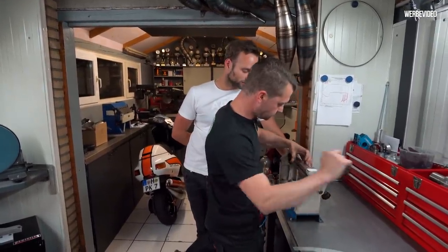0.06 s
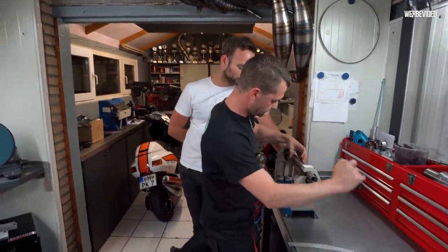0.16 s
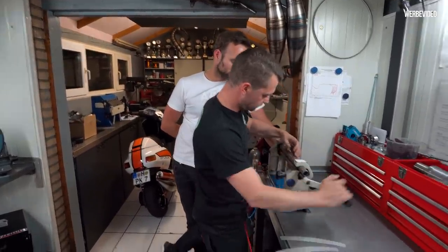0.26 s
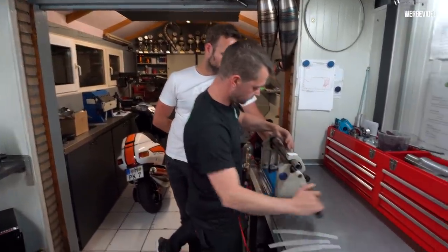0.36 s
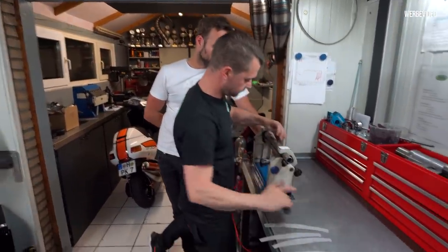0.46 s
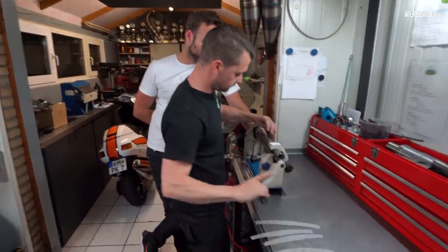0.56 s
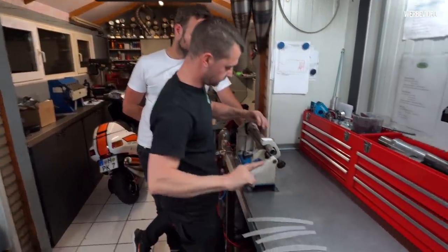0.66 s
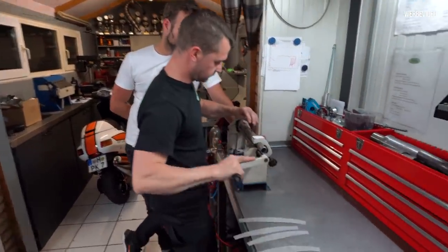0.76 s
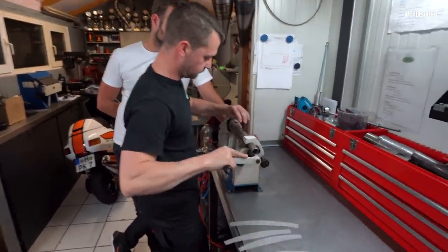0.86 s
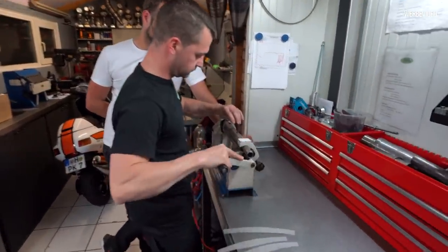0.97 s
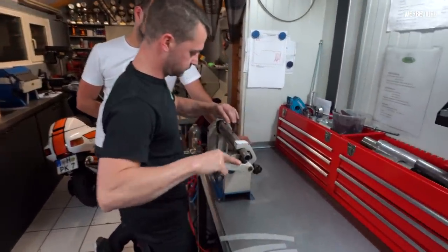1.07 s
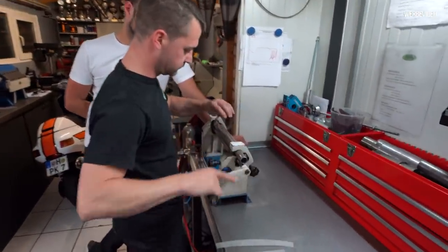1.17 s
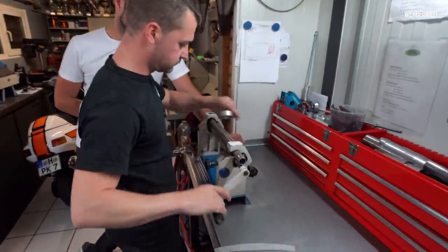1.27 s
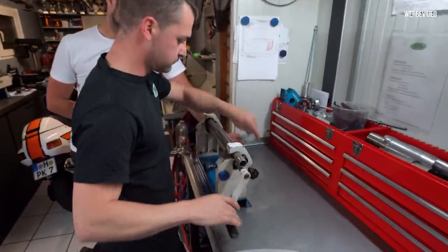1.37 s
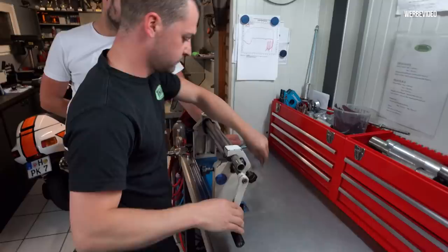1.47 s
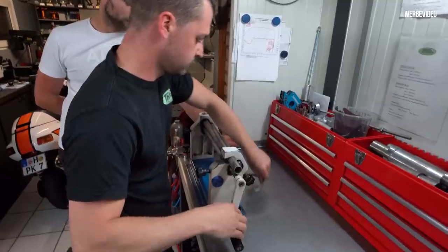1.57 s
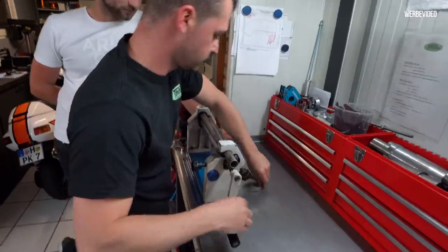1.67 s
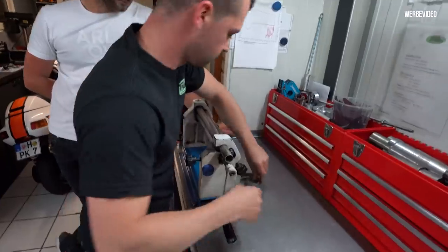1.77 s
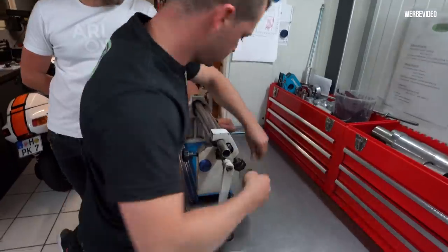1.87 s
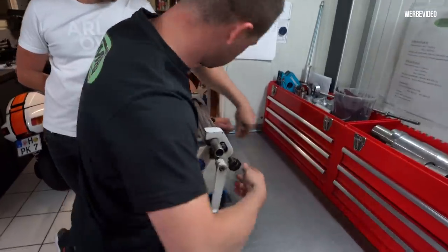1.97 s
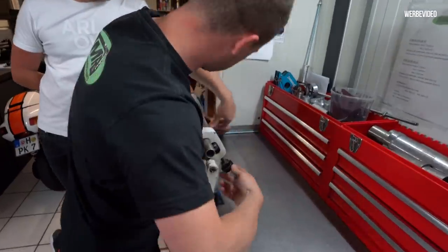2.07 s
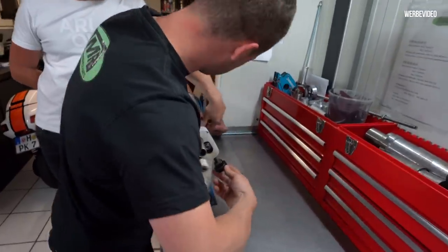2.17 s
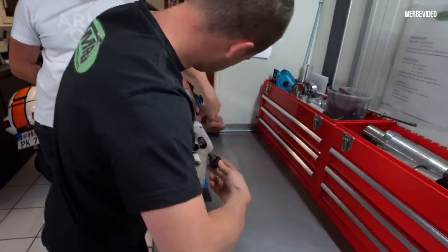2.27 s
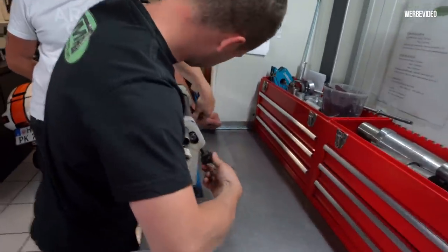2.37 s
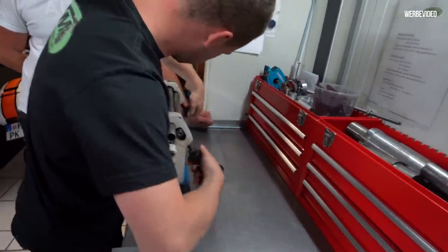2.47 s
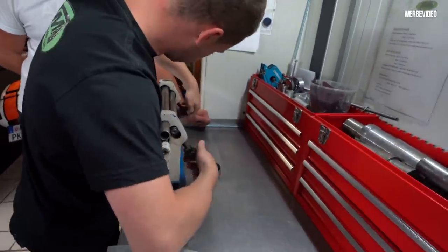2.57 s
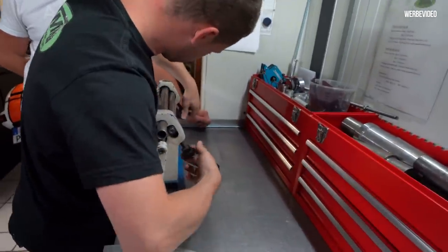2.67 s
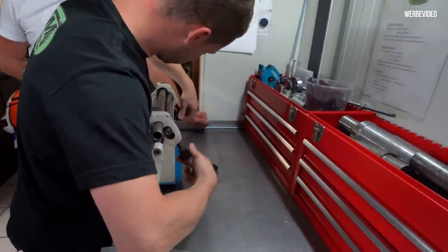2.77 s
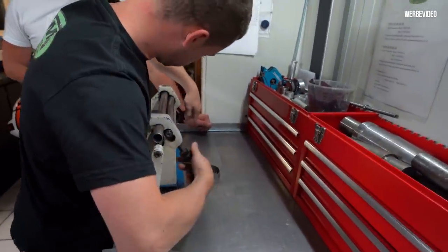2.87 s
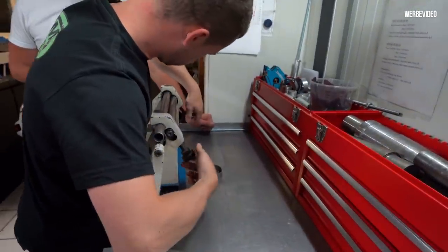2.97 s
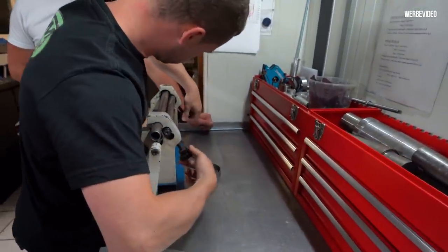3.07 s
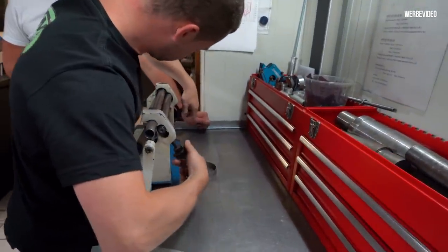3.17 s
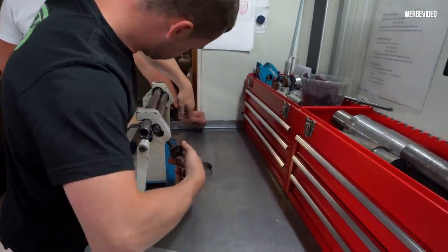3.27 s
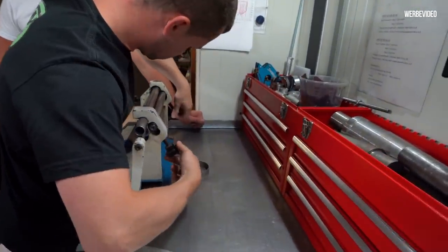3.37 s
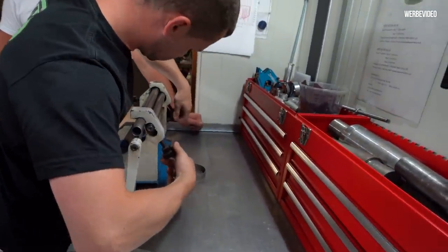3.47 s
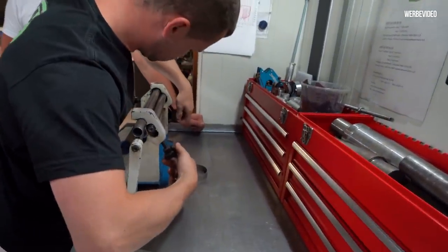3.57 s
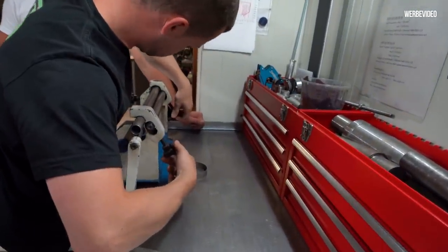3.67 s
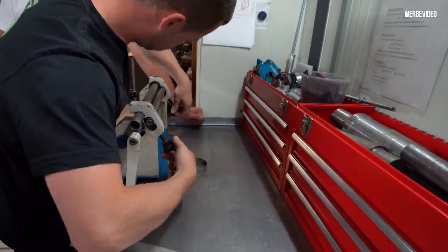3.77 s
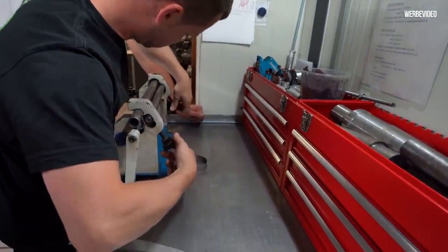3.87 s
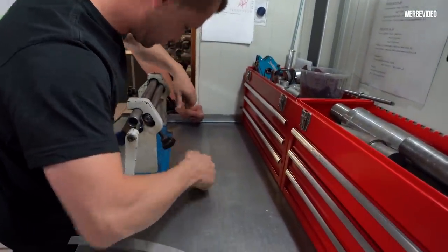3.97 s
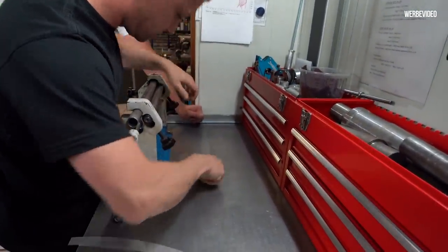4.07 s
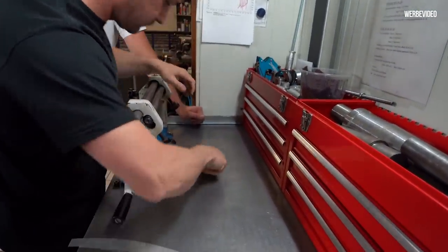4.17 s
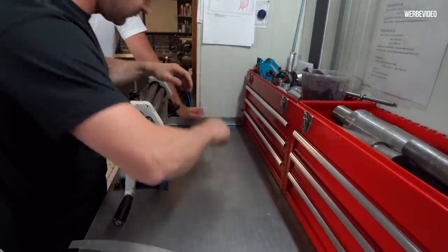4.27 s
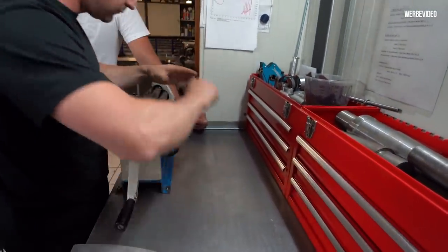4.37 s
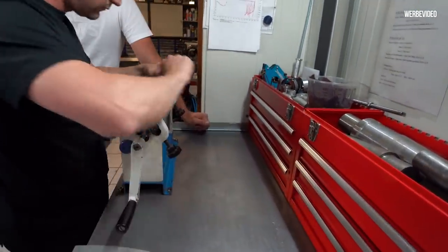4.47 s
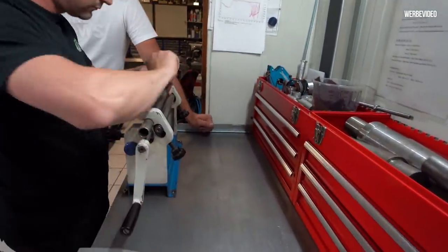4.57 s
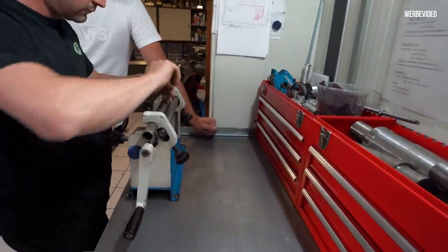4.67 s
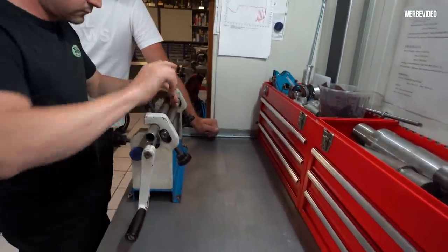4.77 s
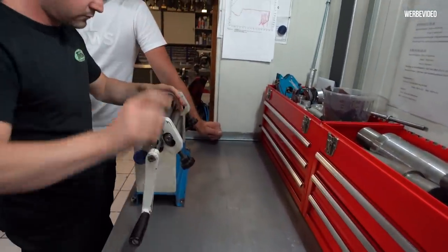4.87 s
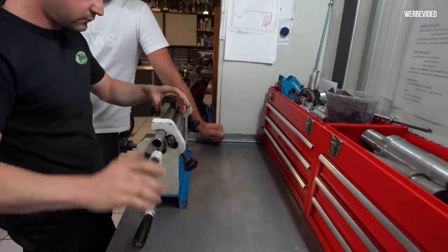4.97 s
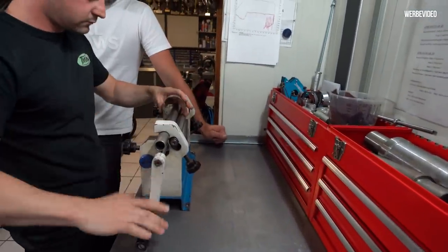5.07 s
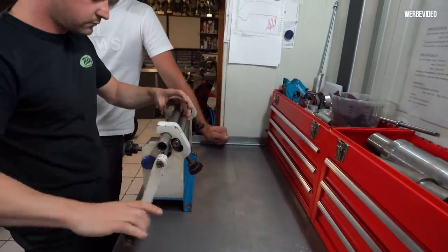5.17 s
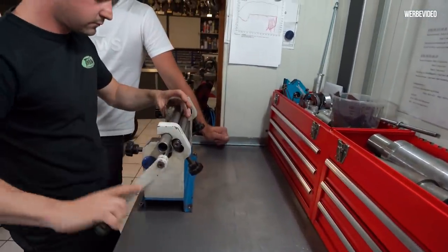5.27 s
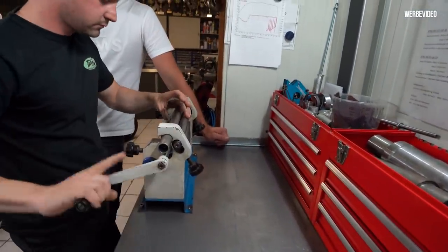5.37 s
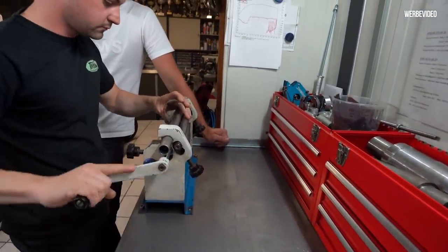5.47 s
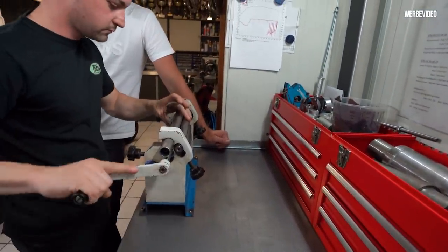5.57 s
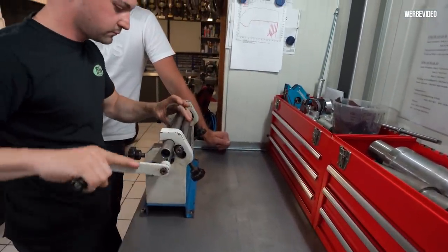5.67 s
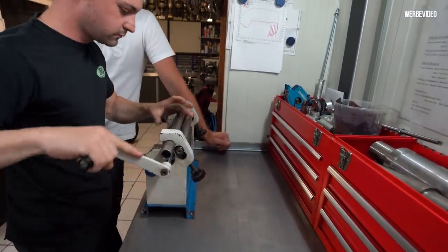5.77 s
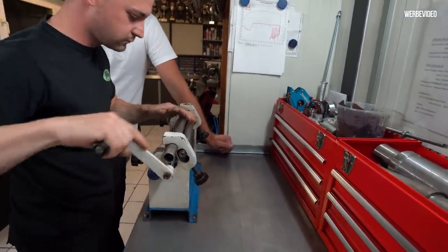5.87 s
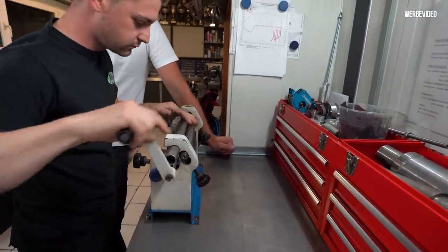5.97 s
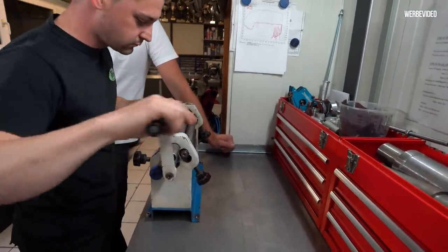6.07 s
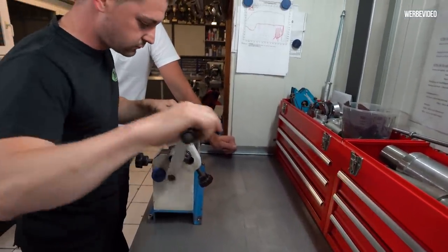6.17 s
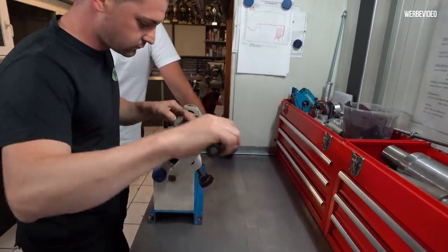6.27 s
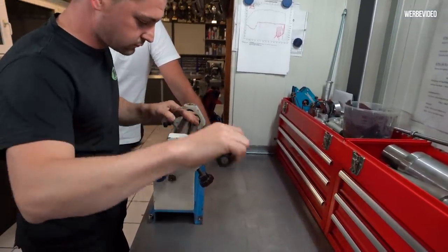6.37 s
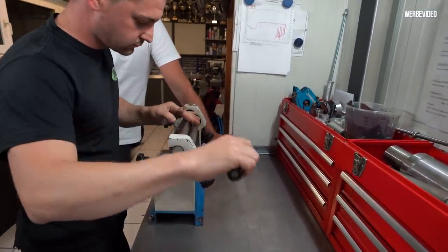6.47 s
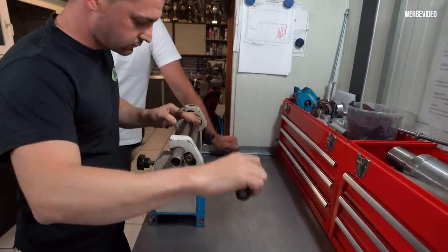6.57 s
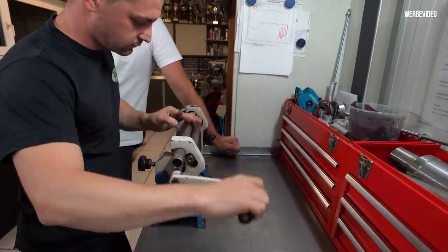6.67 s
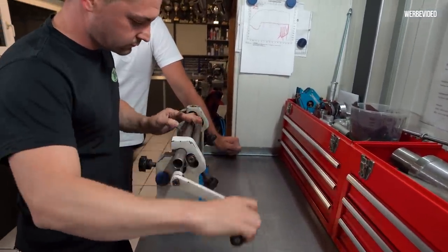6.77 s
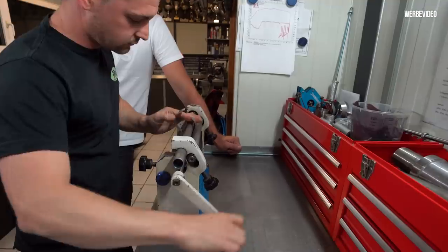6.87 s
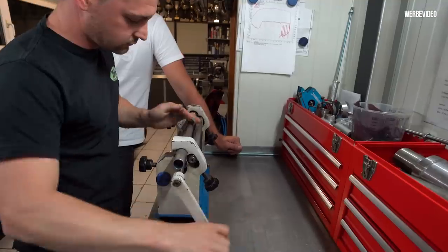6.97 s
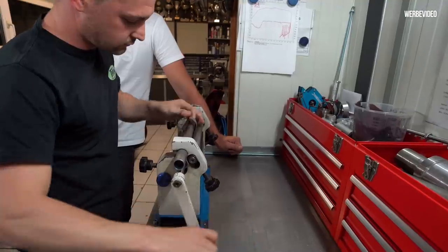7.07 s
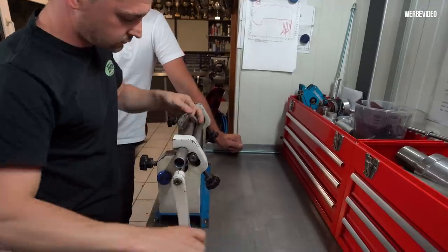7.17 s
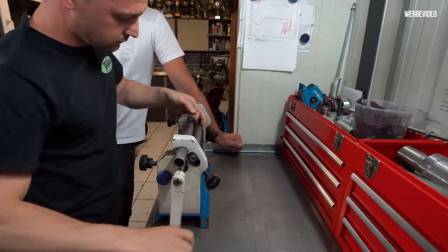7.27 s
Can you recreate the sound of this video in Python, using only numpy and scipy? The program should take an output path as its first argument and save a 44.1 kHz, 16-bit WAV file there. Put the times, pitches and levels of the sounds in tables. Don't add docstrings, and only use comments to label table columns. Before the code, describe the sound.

In a small metal workshop, a hand-cranked rolling machine ticks quickly, about twenty teeth a second, then its handle clanks hard on a stop. Loose parts jingle, and a steel strip scrapes and drops with bright ringing bounces. Sparse knocks and clicks follow, then sharp clacks of the handle and slow, thudding gear turns with faint squeaks. Close small mono microphone, low rumble and hiss ducking in the gaps.

```python
import sys
import numpy as np
from scipy import signal
from scipy.fft import rfft, irfft, next_fast_len
from scipy.io import wavfile
from scipy.ndimage import uniform_filter1d, minimum_filter1d, map_coordinates

SR = 44100
rng = np.random.default_rng(int(sys.argv[2]) if len(sys.argv) > 2 else 0)


def log_audio(samples):
    frames = np.atleast_2d(samples).T
    limited = np.clip(frames, -1, 1)
    pcm = np.round(limited * 32767).astype(np.int16)
    wavfile.write(sys.argv[1], SR, pcm)


def how_loud(loudness_db):
    steps = np.asarray(loudness_db, float) / 20
    return 10 ** steps


N = 322944
T = np.arange(SR // 5) / SR


def unit(x):
    return x / np.sqrt(np.mean(x ** 2) + 1e-20)


def along(points, hz):
    f, v = np.transpose(points)
    return np.interp(np.log(hz + 1), np.log(f + 1), v)


def curves(rows, off=-140):
    s, *cols = np.transpose(rows)
    return [np.interp(np.arange(N) / SR, s, c, off, off) for c in cols]


def noise(spectrum, size=N):
    m = next_fast_len(size)
    points = [(10, -120)] + list(spectrum) + [(spectrum[-1][0] * 1.5, -60)]
    gain = how_loud(along(points, np.fft.rfftfreq(m, 1 / SR)))
    return unit(irfft(rfft(rng.standard_normal(m)) * gain, m)[:size])


def wobble(rate, size=N):
    knots = rng.standard_normal(int(size * rate / SR) + 4)
    return map_coordinates(knots, [np.arange(size) * rate / SR])


def add(track, s, sound):
    track[round(s * SR):][:len(sound)] += sound


def ring(modes, scatter_db, attack=0.0018, rough_db=0):
    hz, db, t60 = np.transpose(modes)[:, :, None]
    db = db + rng.normal(0, scatter_db, db.shape)
    hz = hz * rng.normal(1, 0.00024, hz.shape)
    phase = rng.uniform(0, 2 * np.pi, hz.shape)
    flutter = np.repeat(rng.standard_normal((len(hz), len(T) // 256 + 1)), 256, axis=1)[:, :len(T)]
    db = db + rough_db * uniform_filter1d(flutter, size=256, axis=1)
    partials = how_loud(db - 60 * T / t60) * np.sin(2 * np.pi * hz * T + phase)
    return partials.sum(0) * (1 - np.exp(-T / attack))


def burst(spectrum, t60, attack=0.00023):
    return noise(spectrum, size=len(T)) * how_loud(-60 * T / t60) * (1 - np.exp(-T / attack))


def thud(hz, swell, rough=0.32):
    u = T / max(swell, .003)
    near = noise([(hz * 0.2, -16), (hz * 0.66, -3), (hz, 0), (hz * 1.27, -5), (hz * 3, -22)], size=len(T))
    return (np.sin(2 * np.pi * hz * T) + rough * near) * u ** 2 * np.exp(2 - 2 * u)


# time in seconds, rumble in dB.
ROLLING = [(0, -39), (.37, -36), (.6, -42), (.85, -48.5), (1.3, -42), (1.6, -49.5), (2.2, -49),
           (2.49, -45.5), (2.7, -50.5), (3.5, -48), (4.0, -53), (4.3, -50), (4.95, -50.5), (5.6, -55),
           (5.85, -42.5), (6.45, -50), (6.8, -45.5), (7.33, -51.5)]
# frequency in Hz, level in dB per Hz.
RUMBLE = [(24, -40), (45, -31), (123, -1.5), (157, -6.5), (241, -8.5), (444, -18), (700, -28), (910, -51.5)]
GRIND = [(290, -41), (500, -10.5), (1140, -1.5), (1460, -7.5), (1740, -9.5), (2370, -12.5), (7000, -26),
         (9100, -55)]
HISS = [(2500, -19), (5000, -6), (8000, -3), (12000, -0.5), (15500, -1)]
HISS_DB = -66.5
GRIND_DB, GRIND_FOLLOWS = -57, 0.39
BOOM_DB, BOOM_S, BOOM_HZ = -18, 0.073, 500


def background(metal):
    rumble_db, = curves(ROLLING, off=-50)
    width = int(BOOM_S * SR)
    low = uniform_filter1d(metal, SR // BOOM_HZ // 2)
    power_after = np.abs(uniform_filter1d(low ** 2, width, origin=(width - 1) // 2))
    boom = how_loud(BOOM_DB) * power_after ** 0.46
    rumble = (how_loud(rumble_db) + boom) * how_loud(2.9 * wobble(14)) * noise(RUMBLE)
    grind_db = GRIND_DB + GRIND_FOLLOWS * (rumble_db + 51) + 2.4 * wobble(25)
    return rumble + how_loud(grind_db) * noise(GRIND) + how_loud(HISS_DB) * noise(HISS)


# time in seconds, tick peak in dB, ring in Hz, thud in dB, thud in Hz.
QUICK_TEETH = [(0.0175, -29, 1180, -32.5, 394), (0.0648, -27, 1750, -33.5, 470),
               (0.109, -16, 1400, -31, 390), (0.1501, -21, 1300, -34, 481), (0.194, -20, 2020, -33, 392),
               (0.242, -23, 1890, -31.5, 344), (0.299, -24, 1200, -35, 502),
               (0.3468, -23, 1890, -30.5, 454), (0.3924, -21.5, 1330, -29.5, 390),
               (0.4399, -25.5, 1930, -24.5, 393), (0.4915, -26.5, 1956, -26.5, 395),
               (0.5548, -33, 1180, -41, 464), (0.6258, -30, 1520, -33, 286), (0.691, -36.5, 1750, -48, 495),
               (0.7384, -32, 1205, -38.5, 269), (1.1904, -34, 974, -38.5, 596),
               (1.265, -32, 2270, -34.5, 384.5), (1.354, -31, 1730, -35, 389),
               (1.4157, -37, 1770, -51.5, 462), (1.4536, -28, 1810, -46, 355)]
LOADED_TEETH = [(5.6878, -43, 2060, -34.5, 283), (5.7978, -27, 770, -26, 292.5),
                (5.9148, -31.5, 2050, -29.5, 288), (6.019, -33.5, 1340, -36.5, 287),
                (6.114, -26.5, 1340, -26, 485.6), (6.206, -24.5, 1180, -22, 382),
                (6.3074, -31, 1216, -29.5, 373), (6.5, -39.5, 1210, -29, 384),
                (6.6375, -29, 1660, -23, 382), (6.747, -31, 1180, -24, 390), (6.8468, -27, 796, -23, 390),
                (6.962, -29, 2070, -30, 390), (7.1356, -42, 1630, -35, 364)]
# frequency in Hz, level in dB, t60 in seconds.
FRAME = [(775, -9.5, 0.09), (1180, -0.5, 0.11), (1354, 0, 0.065), (1664, -2, 0.076), (2065, -8.5, 0.17),
         (2650, -12.5, .1), (3870, -11, 0.022), (4630, -22, 0.033)]
LOADED_FRAME = [(774, -3, 0.09), (1180, 2.5, 0.089), (1356, -4, 0.044), (1660, 0.5, 0.097),
                (2065, -10, 0.1), (2440, -16, .06), (2660, -16, .07)]
QUICK_TREBLE_DB, QUICK_SWELL_S = -19.5, 0.014
LOADED_TREBLE_DB, LOADED_SWELL_S = -24, .017
TREBLE_LAG = 0.35


def gears():
    out = np.zeros(N + SR)
    teeth = [(*row, QUICK_TREBLE_DB, QUICK_SWELL_S, FRAME, .0005) for row in QUICK_TEETH]
    teeth += [(*row, LOADED_TREBLE_DB, LOADED_SWELL_S, LOADED_FRAME, .003) for row in LOADED_TEETH]
    for s, db, hz, thud_db, thud_hz, bright_db, swell_s, frame, attack_s in teeth:
        treble_db = bright_db - TREBLE_LAG * (db + 29.5)
        tick = 0.71 * burst([(500, -10.5), (1300, 1.5), (2200, -3.5), (3200, -16.5)], t60=0.096, attack=attack_s)
        tick += .55 * ring(frame, scatter_db=1.0, rough_db=4.5)
        tick += .9 * ring([(hz, 0, .07)], scatter_db=0.5, rough_db=3.5)
        treble = burst([(2500, -7.5), (3800, 1.5), (4800, -5.0), (5400, -12.0), (11000, -21.5)], t60=0.12)
        tick += how_loud(treble_db + 8.0) * treble
        add(out, s, how_loud(db - 9.5) * tick + how_loud(thud_db) * thud(thud_hz, swell_s, rough=0.42))
    return out


# time in seconds, peak in dB, pitch in Hz.
BUMPS = [(0.219, -24, 303), (0.356, -23, 112.3), (0.389, -28.5, 116), (0.875, -30.5, 381),
         (0.927, -19.5, 218), (1.003, -24.5, 395), (1.027, -28, 392), (1.1, -30.5, 403), (1.209, -29, 397),
         (1.665, -31.5, 133), (1.849, -26.5, 147), (2.169, -29.5, 137.5), (2.458, -41.5, 242),
         (2.838, -30, 188), (3.448, -30.5, 128.5), (3.479, -33.5, 247), (3.671, -34.5, 106.4),
         (4.093, -27.5, 153), (4.343, -35, 129), (4.949, -40, 187), (4.999, -43.5, 365), (5.228, -28, 200),
         (5.44, -17.5, 177.4), (5.477, -32, 181), (5.515, -36, 177), (5.701, -22.5, 189),
         (5.75, -28.5, 180), (5.811, -16, 193), (5.924, -23, 180), (6.03, -26.5, 174), (6.217, -15.5, 126),
         (6.32, -25.5, 326), (2.19, -33, 134), (2.405, -42, 399), (2.8, -27.5, 401), (2.838, -33.5, 484),
         (6.655, -26, 381), (6.93, -35, 198), (7.21, -43, 347)]


def bumps():
    out = np.zeros(N + SR)
    for s, db, hz in BUMPS:
        add(out, s, how_loud(db - 2.5) * thud(hz, swell=.011, rough=0.49))
    return out


# time in seconds, peak in dB.
CLANK = [
    (0.897, -22),
    (0.904, -2),
    (0.918, -11.5),
]
# frequency in Hz, level in dB, t60 in seconds.
CLANK_MODES = [(390, -9.5, 0.22), (770, -12.5, .15), (1136, -11, 0.15), (1318, -9.5, 0.25),
               (1685, -9, 0.18), (2065, -9, 0.069), (2564, -5, 0.3), (2655, -6, 0.21), (3900, -12.5, 0.13),
               (4340, -24.5, 0.39), (5230, -11.5, 0.25), (6070, -30, .2), (7600, -26, 0.22)]
# frequency in Hz, level in dB per Hz.
CLANK_BURST = [(200, -3), (564, -11.5), (1380, -4.5), (2250, -13), (2600, -2.5), (2850, -10), (5300, -11.5),
               (15500, -43.5)]


def handle():
    out = np.zeros(N + SR)
    for s, db in CLANK:
        clank = 0.4 * ring(CLANK_MODES, scatter_db=1.5, attack=0.003, rough_db=3.0)
        clank += 1.17 * burst(CLANK_BURST, t60=0.055, attack=0.0044)
        tail = burst([(400, -1.5), (1500, 1.5), (3500, -3.5), (5500, -8.5), (8000, -29)], t60=0.24, attack=0.0016)
        add(out, s, how_loud(db - 4.5) * (clank + 0.25 * tail))
    return out


# time in seconds, peak in dB, ring in Hz, thud in dB, thud in Hz.
KNOCKS = [
    (2.78, -19.5, 1292, -25.5, 390),
    (3.1131, -26, 1150, -24, 495),
    (4.075, -56, 780, -47.5, 550.5),
    (4.887, -30, 2190, -47.5, 620),
    (4.908, -40, 3470, -46, 390),
    (5.1259, -34, 1755, -37, 197),
    (5.4287, -32, 982, -34.5, 204),
]
# time in seconds, peak in dB, ring in Hz, treble in dB re peak.
CLICKS = [(1.001, -21, 2550, -8), (1.151, -35.5, 3030, -1), (1.157, -34, 1970, -10), (2.931, -54, 1130, -8),
          (2.985, -46, 1120, -16), (3.025, -47, 1135, -8.5), (3.1509, -31.5, 1316, -15),
          (3.287, -55.5, 1074, -16.5), (3.3094, -43, 1040, -11), (3.3387, -40.5, 1032, -38),
          (3.711, -31.5, 1580, -9.5), (3.7742, -42.5, 1180, -32.5), (3.8975, -42, 1100, -17),
          (4.26, -41, 640, -27.5), (4.3346, -36, 1153, -24), (4.768, -37, 3400, -6), (4.979, -44, 3470, 0),
          (3.362, -51, 1103, -20), (5.1083, -36, 1780, -25.5)]
# frequency in Hz, width in Hz, level in dB.
BENCH = [(382, 16.4, -1), (495, 19, 1), (668, 19, -8.5), (1326, 36, -7)]
KNOCK_TREBLE_DB, CLICK_THUD_DB, CLICK_THUD_HZ = -49, -20.5, 211


def knocks():
    out = np.zeros(N + SR)
    heavy = [(s, db, hz, KNOCK_TREBLE_DB, thud_db, thud_hz) for s, db, hz, thud_db, thud_hz in KNOCKS]
    light = [(s, db, hz, treble_db, db + CLICK_THUD_DB, CLICK_THUD_HZ) for s, db, hz, treble_db in CLICKS]
    for s, db, hz, treble_db, thud_db, thud_hz in heavy + light:
        hit = burst([(500, -17.5), (1300, -4.5), (2500, -8.0), (5000, -14.5)], t60=0.045, attack=.001)
        hit += how_loud(treble_db + 0.5) * burst([(3500, -16), (5000, 5.5), (9000, -18.0)], t60=0.033)
        hit += 0.25 * ring(FRAME, scatter_db=1.5, rough_db=7.0)
        hit += .8 * ring([(hz, 0, 150 / hz)], scatter_db=0, rough_db=4)
        body = thud(thud_hz, swell=0.009, rough=0.57)
        body += 0.79 * burst([(250, -3.5), (500, 5.5), (900, -7.5), (1700, -15.5)], t60=0.144, attack=0.0019)
        bench = [(f, level_db, 2.3 / width) for f, width, level_db in BENCH]
        body += 0.7 * ring(bench, scatter_db=0.5, rough_db=1.5)
        add(out, s, how_loud(db - 7.5) * hit + how_loud(thud_db + 3.5) * body)
    return out


# time in seconds, peak in dB.
JINGLE = [
    (1.079, -36.5),
    (1.092, -40.5),
    (1.102, -35),
    (1.123, -41.5),
    (1.139, -40),
    (1.151, -36),
]
# frequency in Hz, level in dB, t60 in seconds.
JINGLE_MODES = [(4360, -2, 0.055), (6470, -25, 0.064), (9700, -10.5, 0.06), (11100, -2, 0.081),
                (12620, -7, 0.091), (14460, -18, .07), (15250, -4, 0.088)]


def jingle():
    out = np.zeros(N + SR)
    for s, db in JINGLE:
        rings = ring(JINGLE_MODES, scatter_db=3, attack=0.0023, rough_db=4.5)
        grit = burst([(2500, -0.5), (4500, 4.0), (15500, -4.0)], t60=0.074, attack=0.0031)
        add(out, s, how_loud(db - 8.0) * (rings + 1.3 * grit))
    return out


# start in seconds, rise in seconds, length in seconds, level in dB, treble in dB re level.
SLIDES = [
    (1.474, .045, 0.16, -48, -11.5),
    (1.649, 0.013, 0.041, -34, 5),
    (1.65, 0.048, 0.15, -29, -13),
    (2.615, 0.042, 0.135, -35.5, -32),
    (2.685, 0.033, 0.091, -43, -24),
    (4.076, 0.026, 0.13, -59.5, 10.5),
    (4.357, 0.058, 0.1233, -53, -15),
    (4.892, .015, 0.19, -54, -4),
    (5.092, 0.035, 0.082, -54.5, -31),
]
# frequency in Hz, level in dB per Hz.
SCRAPE = [(450, -20.5), (750, -3.5), (1000, -8), (1250, -6), (1600, -9.5), (2150, 1), (2800, -8.5),
          (3900, -5), (5500, -16.5), (8000, -32.5)]
SHIMMER = [(3000, -14), (4400, 0.5), (5400, -6), (6400, -1.5), (7500, -5), (11000, -5), (15500, -10.5)]
SLIDE_HOLD, SLIDE_RISE_DB, SLIDE_FALL_DB = 0.2, 21, 26.5


def slides():
    level, treble = np.zeros((2, N))
    for s, rise, length, db, treble_db in SLIDES:
        hold = rise + SLIDE_HOLD * (length - rise)
        points = [(s, -SLIDE_RISE_DB), (s + rise, 0), (s + hold, -3), (s + length, -SLIDE_FALL_DB)]
        stroke_db, = curves(points)
        level += how_loud(db + stroke_db)
        treble += how_loud(db + stroke_db + treble_db)
    grit = unit(how_loud(1.4 * wobble(300)))
    return grit * (level * noise(SCRAPE) + treble * noise(SHIMMER))


# start in seconds, length in seconds, start in Hz, end in Hz, level in dB.
SQUEAKS = [
    (1.596, 0.037, 13000, 11800, -62),
    (6.15, 0.15, 12300, 13500, -69),
    (6.411, 0.051, 10600, 10400, -67),
    (6.675, 0.0524, 10400, 10200, -68),
    (5.648, 0.2, 2065, 2065, -69),
    (6.455, 0.24, 2065, 2065, -67.5),
    (6.681, 0.13, 2065, 2065, -55),
    (6.803, 0.092, 2065, 2065, -51),
    (6.911, .11, 2065, 2065, -56),
]


def squeaks():
    out = np.zeros(N + SR)
    for s, length, start_hz, end_hz, db in SQUEAKS:
        u = np.arange(round(length * SR)) / (length * SR)
        hz = (start_hz + (end_hz - start_hz) * u) * (1 + 0.011 * wobble(200, size=len(u)))
        level = how_loud(db + 5 * wobble(45, size=len(u))) * np.sqrt(np.sin(np.pi * u))
        add(out, s, level * np.sin(2 * np.pi * np.cumsum(hz) / SR))
    return out


# time in seconds, ring peak in dB,
# then clatter, low modes and top modes in dB re ring.
STRIP = [(1.7893, -22, -11, -10, 0), (1.794, -12, -11.5, -10, 0), (1.7981, -2.5, -13, -3, 0),
         (1.811, -7, -13.5, -4, 2), (1.8279, -7.5, -12.5, -4, 3.5), (1.8444, -11, -8.5, -5.5, 3),
         (1.8624, -8.5, -10.5, -3, -3), (1.8793, -11.5, -7, -8.5, -3), (1.8936, -12, -8.5, -5, -3),
         (1.909, -15.5, -11.5, -2.5, -3), (1.9264, -18.5, -15.5, -6, -10)]
HELD_STRIP = [
    (1.6544, -24, -20.5, -3, -7),
    (1.6587, -27, -4.5, 3, -7),
    (1.6743, -27.5, 5.5, -1, -3.5),
    (1.7091, -38, 9, 1.5, -4),
    (4.184, -44.5, 11.5, -13, 2),
    (4.1963, -36, -3.5, 4, -1),
]
STRIP_HZ = [2866, 3879, 5050, 6345, 6605, 7812, 9246, 9392, 10802, 11138, 12450, 12999, 14186, 15035]
# level in dB, t60 in seconds.
STRIP_MODES = [(-3, 0.35), (-4, .13), (-9, 0.29), (-16, 0.22), (-14, 0.1), (-1.5, 0.17), (-13.5, .22),
               (-5, 0.28), (-10, 0.16), (-4, 0.29), (-15, .18), (-5, 0.34), (-0.5, .16), (-10.5, .12)]
# frequency in Hz, level in dB per Hz.
CLATTER = [(300, -12), (1200, -4), (2000, 3), (3200, -2), (5500, -5), (8000, -28)]
HELD_S = 0.015


def strip():
    out = np.zeros(N + SR)
    modes = np.column_stack([STRIP_HZ, STRIP_MODES])
    gaps = [*np.diff(np.transpose(STRIP)[0], append=np.inf), *[HELD_S] * len(HELD_STRIP)]
    for (s, db, clatter_db, low_db, top_db), gap in zip(STRIP + HELD_STRIP, gaps):
        bounce = ring(modes[5:10], scatter_db=2.0, attack=0.0012)
        bounce += 0.6 * burst([(5000, 0), (8000, -0.5), (15500, -2.5)], t60=0.064)
        bounce += how_loud(low_db + 6.5) * ring(modes[:5], scatter_db=1.0, attack=0.0015)
        bounce += how_loud(top_db) * ring(modes[10:], scatter_db=2.0, attack=0.0012)
        choke = how_loud(-60 * np.maximum(T - gap, 0) / 0.06)
        clatter = burst(CLATTER, t60=0.12, attack=0.0025)
        add(out, s, how_loud(db - 13.5) * bounce * choke + how_loud(db + clatter_db) * clatter)
    return out


# time in seconds, peak in dB.
WASHER = [
    (4.887, -44.5),
    (4.91, -51),
    (4.94, -52),
    (4.96, -51),
    (4.978, -52),
]
# frequency in Hz, level in dB, t60 in seconds.
WASHER_MODES = [(2280, -4, .06), (3420, -2.5, 0.063), (4620, -9, .06), (7100, -1, .05), (13150, -2, 0.08),
                (14550, -7, .06)]


def washer():
    out = np.zeros(N + SR)
    for s, db in WASHER:
        add(out, s, how_loud(db) * ring(WASHER_MODES, scatter_db=3.5, rough_db=2))
    return out


# time in seconds, peak in dB, own ring in Hz, own ring in dB.
CLACKS = [
    (5.1742, -20, 3240, 0),
    (5.184, -20, 2025, -3),
    (5.216, -13.5, 1672, 1.5),
    (5.4017, -26, 3530, -0.5),
]
# frequency in Hz, level in dB, t60 in seconds.
CLACK_MODES = [(595, -4, 0.16), (732, -2.5, 0.14), (1088, -10.5, 0.17), (1367, -2.5, 0.095),
               (1460, -9, 0.095), (1674, -1.5, 0.1), (2080, -3, 0.095), (2665, -12.5, 0.14),
               (3260, -11, 0.099), (3770, -20, 0.11), (4005, -9, 0.077), (4969, -40, 0.18)]


def clacks():
    out = np.zeros(N + SR)
    for s, db, hz, own_db in CLACKS:
        rings = 0.41 * ring(CLACK_MODES, scatter_db=2.0, attack=.001, rough_db=2.5)
        own = ring([(hz, 0, 150 / hz), (5250, -9, .04)], scatter_db=0.5, attack=0.00089, rough_db=3.0)
        rings += how_loud(own_db) * own
        crack = burst([(500, -3), (1300, 0.5), (3000, -1.5), (5300, -8), (9000, -27.5)], t60=0.048)
        add(out, s, how_loud(db - 6) * (rings + 0.75 * crack))
        add(out, s, how_loud(db - 15.5) * thud(CLICK_THUD_HZ, swell=0.011, rough=0.7))
    return out


# time in seconds, peak in dB, ring in Hz.
RELEASES = [
    (5.7375, -51, 2220),
    (5.7809, -49, 2140),
    (5.845, -43, 2280),
    (5.8957, -45, 2300),
    (5.95, -41, 2620),
    (6.3476, -51, 2430),
    (6.5287, -55, 2190),
    (6.678, -44, 2400),
    (6.7883, -42, 2350),
    (6.892, -44, 2390),
]


def releases():
    out = np.zeros(N + SR)
    for s, db, hz in RELEASES:
        snap = burst([(1500, -12), (2400, 2), (3500, -8), (6000, -17)], t60=0.038)
        snap += 0.96 * ring([(hz, 0, .04)], scatter_db=1)
        add(out, s, how_loud(db - 5.5) * snap)
    return out


# frequency in Hz, level in dB, t60 in seconds.
PIN = [(3275, 2, 0.07), (7200, -14, 0.0587), (11770, -6, 0.07)]
PIN_S, PIN_DB = 7.213, -43


def pin():
    out = np.zeros(N + SR)
    add(out, PIN_S, how_loud(PIN_DB) * ring(PIN, scatter_db=1))
    return out


# frequency in Hz, t60 in seconds.
SHOP = [(150, 0.63), (1000, 0.24), (4000, 0.26), (12000, 0.22)]


def shop(x):
    hz, t, z = signal.stft(rng.standard_normal(SR // 2), SR, nperseg=256)
    colour_db = along([(300, -10.5), (600, -7), (1000, -2)], hz)[:, None]
    decay_db = -60 * t / along(SHOP, hz)[:, None]
    tail = signal.istft(z * how_loud(colour_db + decay_db), SR, nperseg=256)[1]
    return signal.fftconvolve(np.pad(x, (300, 0)), tail / np.linalg.norm(tail))[:N]


def scene():
    machine = gears() + releases() + handle() + clacks() + squeaks()
    parts = bumps() + knocks() + jingle() + strip() + washer() + pin()
    metal = (machine + parts)[:N] + slides()
    return (metal + how_loud(-9.0) * shop(metal) + background(metal))[None]


def gate(x, open_db=-38, slope=0.69, depth_db=11, hold_s=0.035, glide_s=0.075):
    level = np.abs(uniform_filter1d(x ** 2, int(0.054 * SR)))
    width = int(hold_s * SR)
    held = -minimum_filter1d(-level, width, origin=(width - 1) // 2)
    gain_db = np.clip(slope * (10 * np.log10(held + 1e-12) - open_db), -depth_db, 0)
    return x * how_loud(uniform_filter1d(gain_db, int(glide_s * SR)))


def top_cut(x):
    return signal.sosfilt(signal.butter(12, 16520, fs=SR, output="sos"), x)


def record(dry):
    top_hz, bass_cut_hz = 15830, 90
    hz = np.fft.rfftfreq(N, 1 / SR)
    in_band = hz < top_hz
    mic = in_band / np.sqrt(1 + (bass_cut_hz / (hz + 1)) ** 12) + in_band * how_loud(-42)
    mix = irfft(rfft(gate(dry[0])) * mic, N)[None]
    return top_cut(mix)


dry = scene()
out = record(dry)
log_audio(out)
```